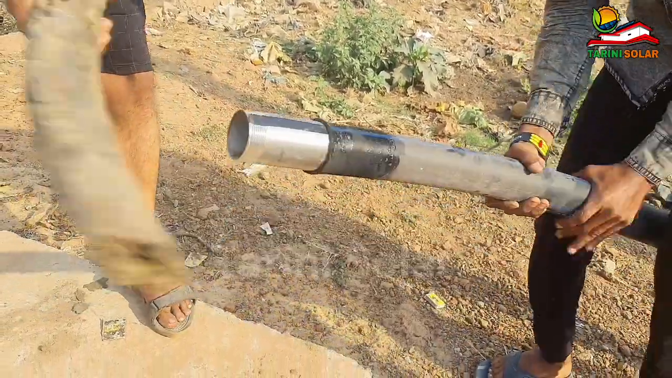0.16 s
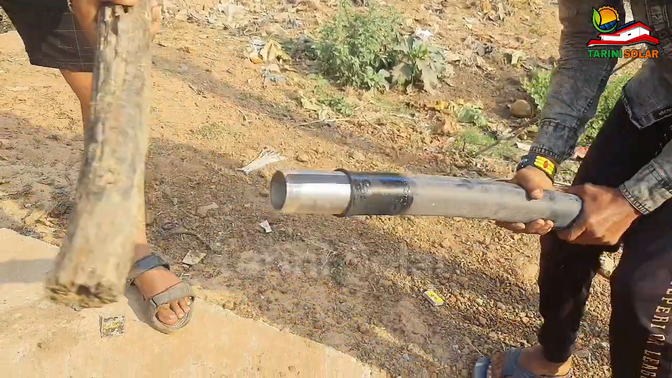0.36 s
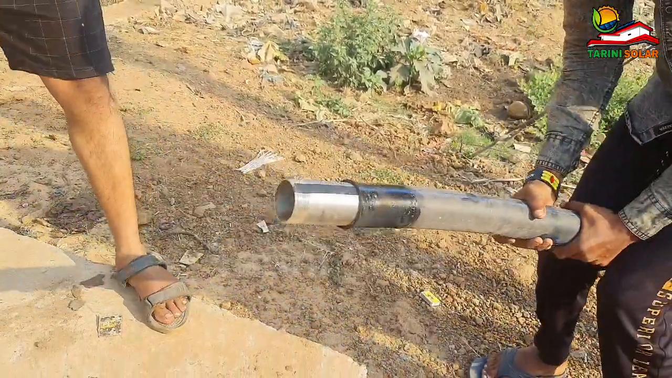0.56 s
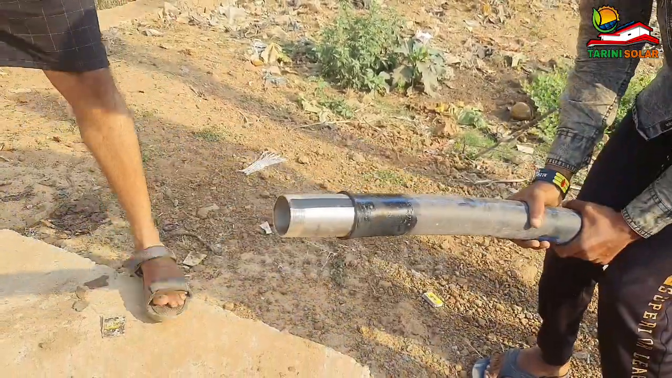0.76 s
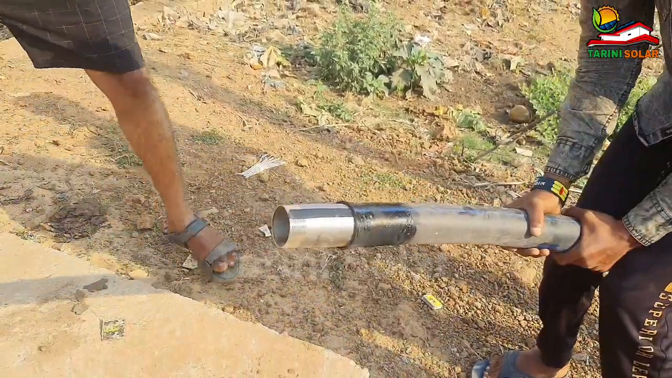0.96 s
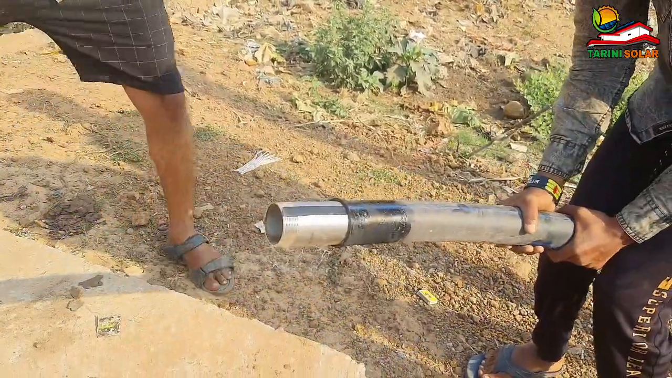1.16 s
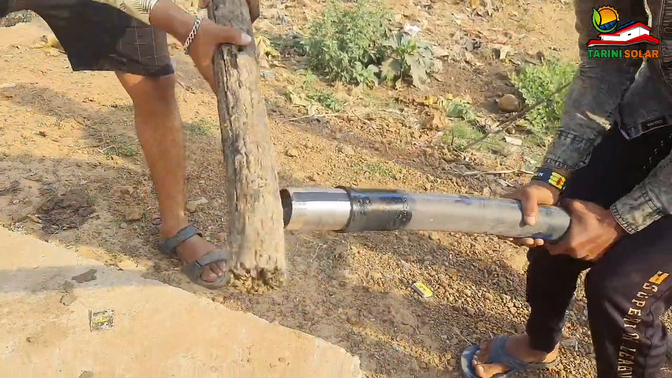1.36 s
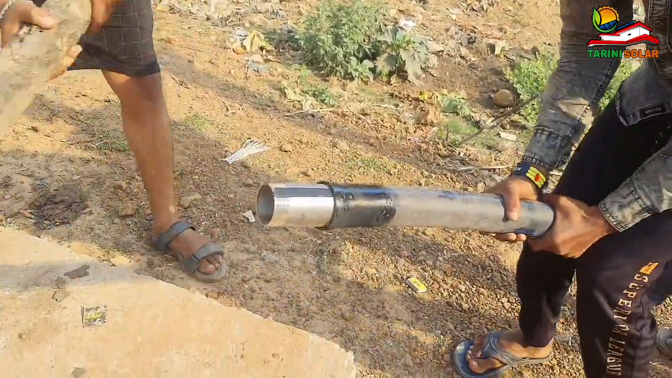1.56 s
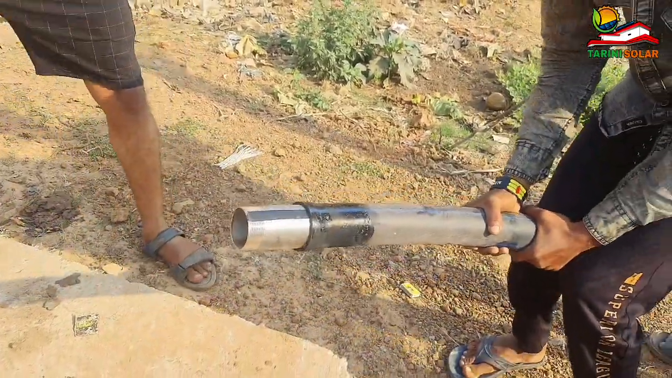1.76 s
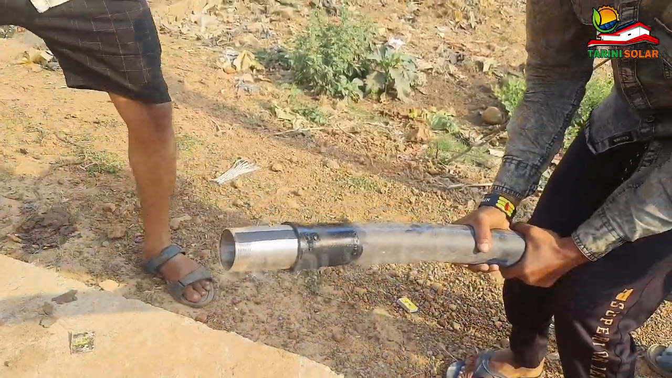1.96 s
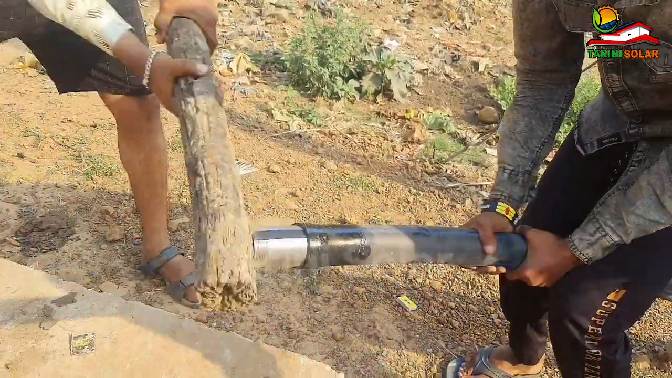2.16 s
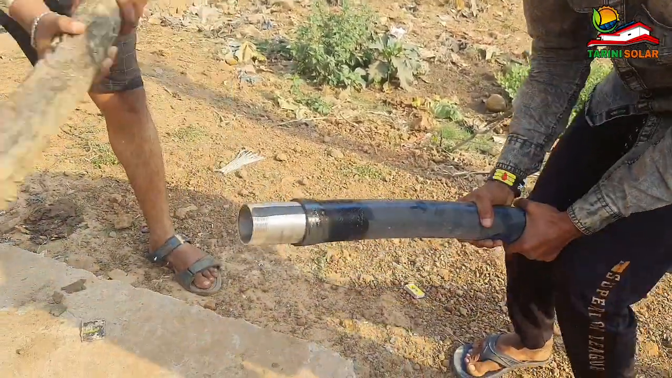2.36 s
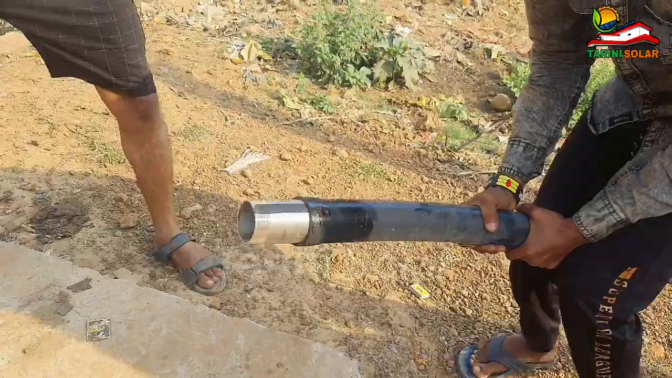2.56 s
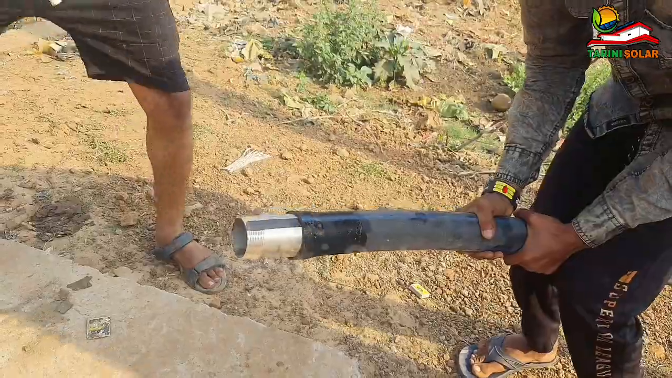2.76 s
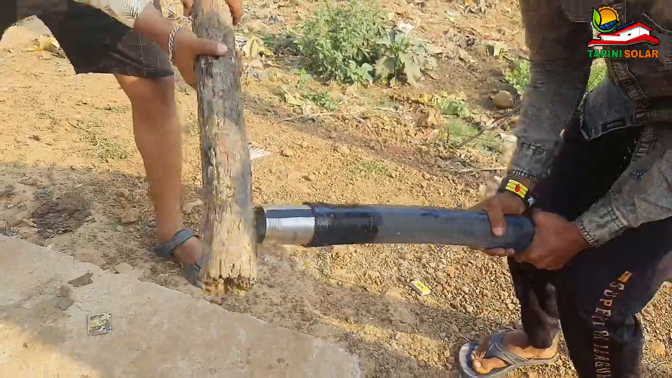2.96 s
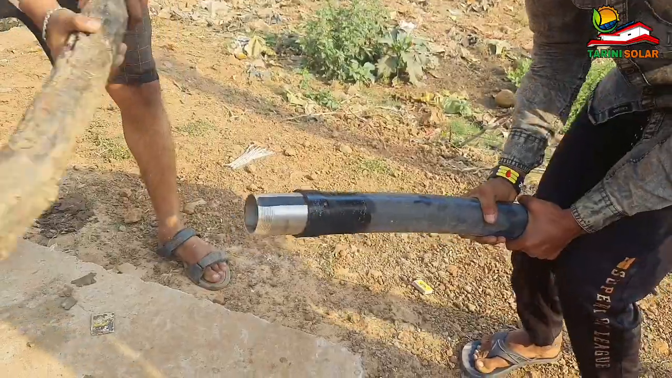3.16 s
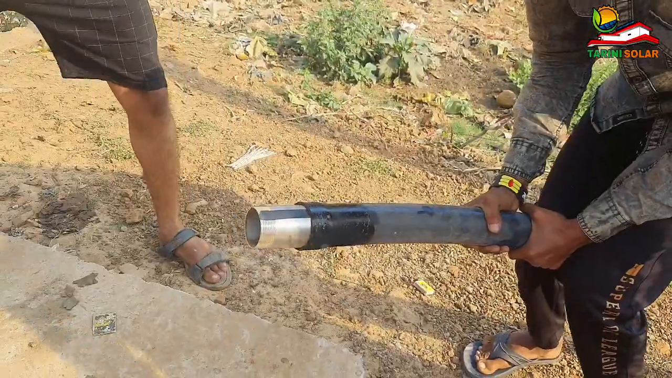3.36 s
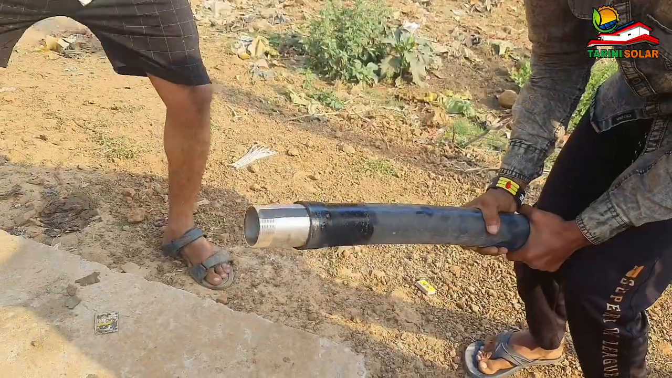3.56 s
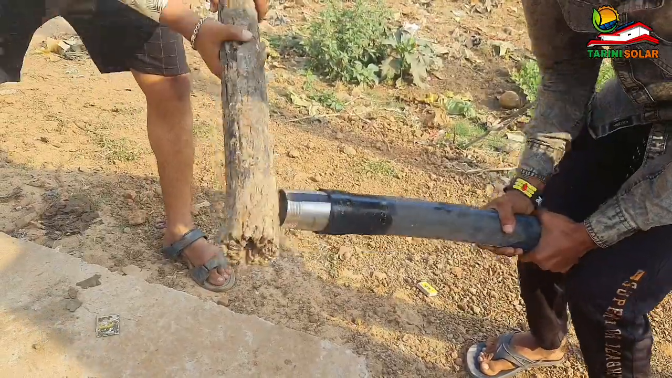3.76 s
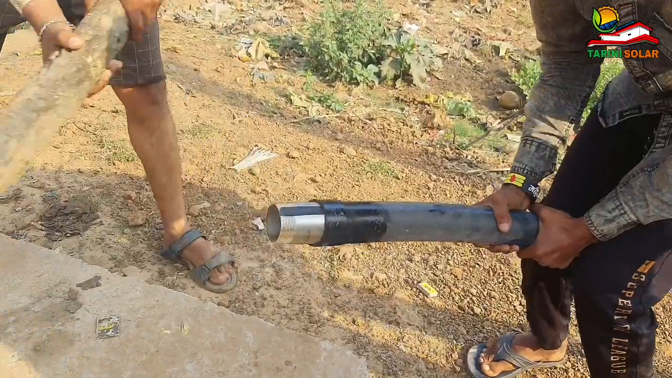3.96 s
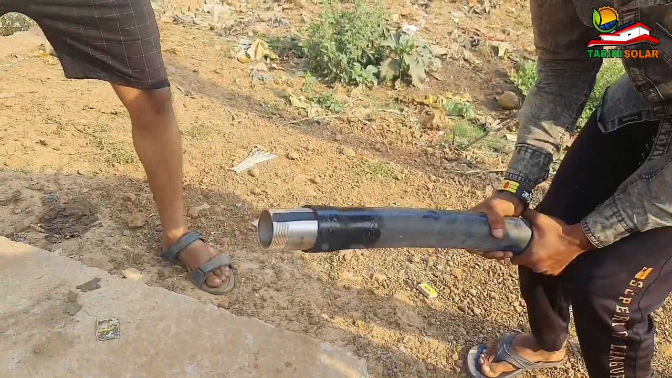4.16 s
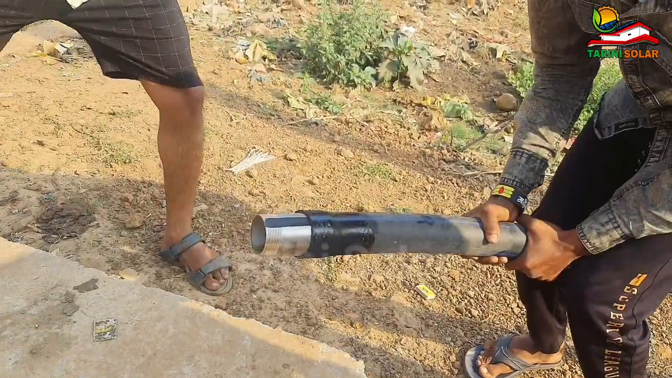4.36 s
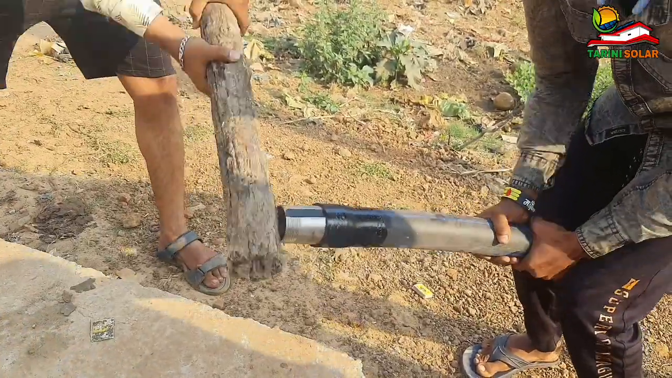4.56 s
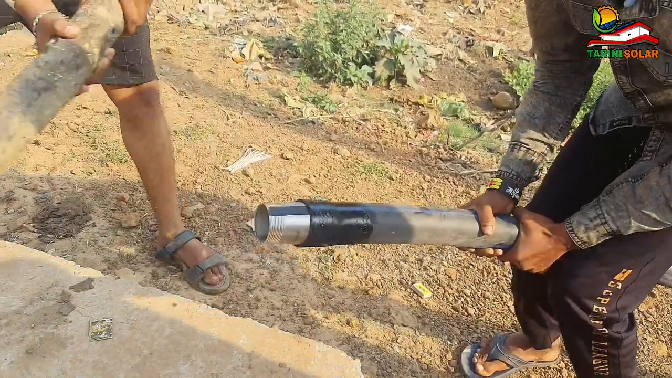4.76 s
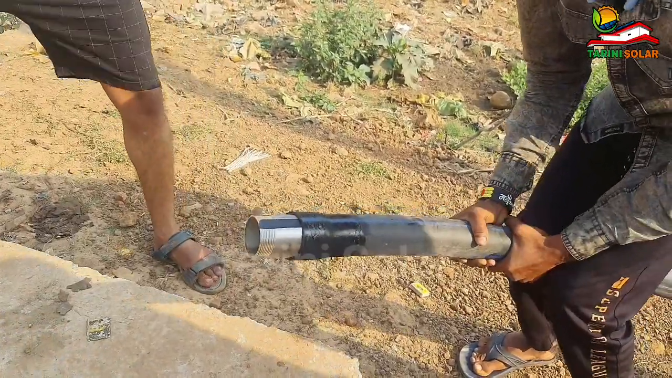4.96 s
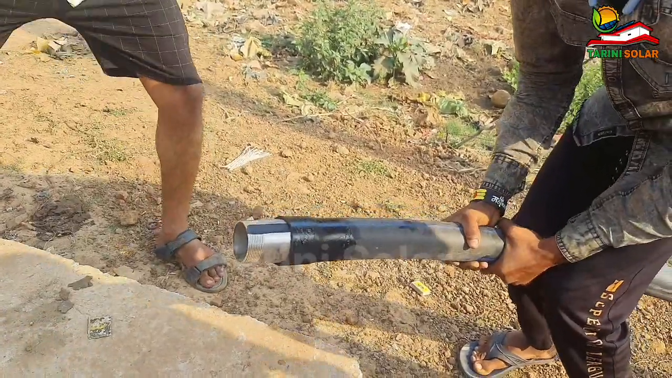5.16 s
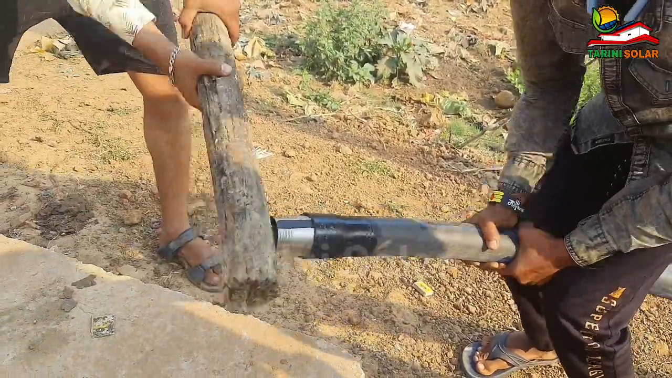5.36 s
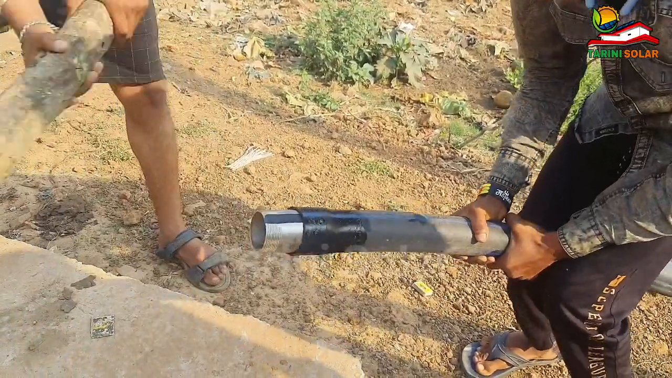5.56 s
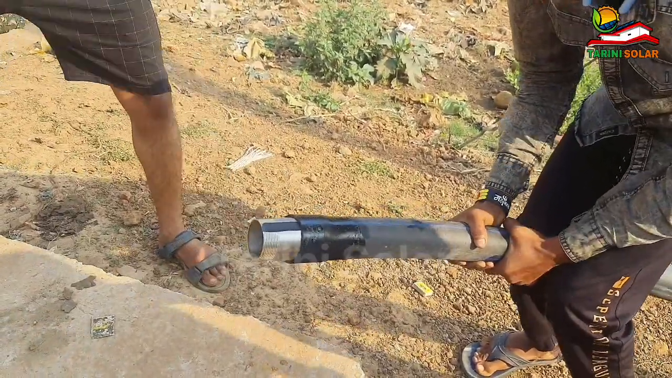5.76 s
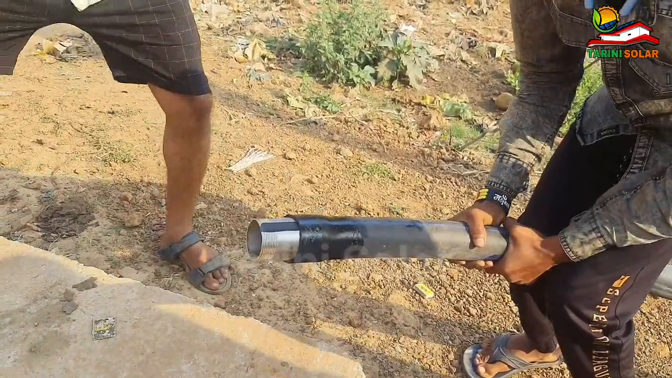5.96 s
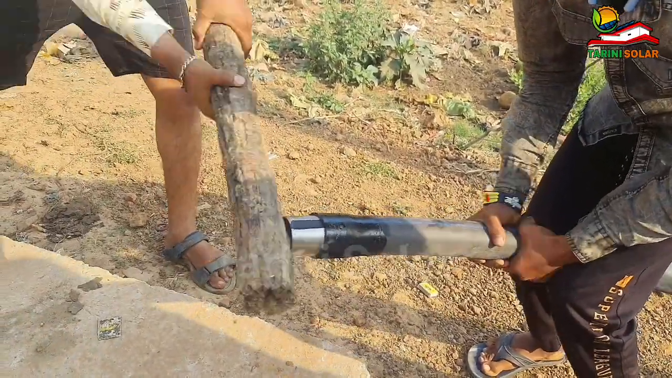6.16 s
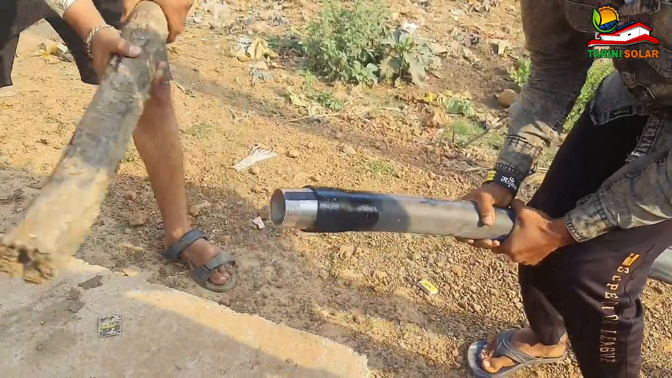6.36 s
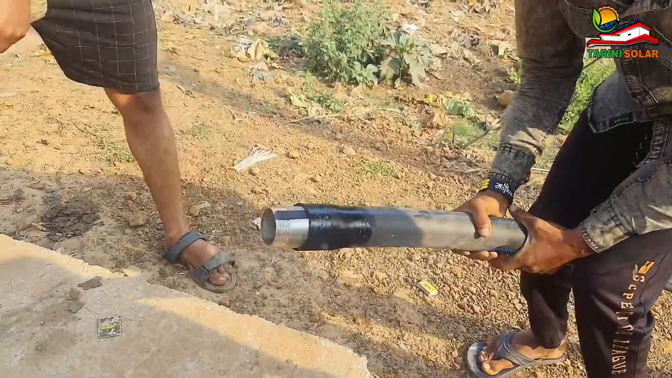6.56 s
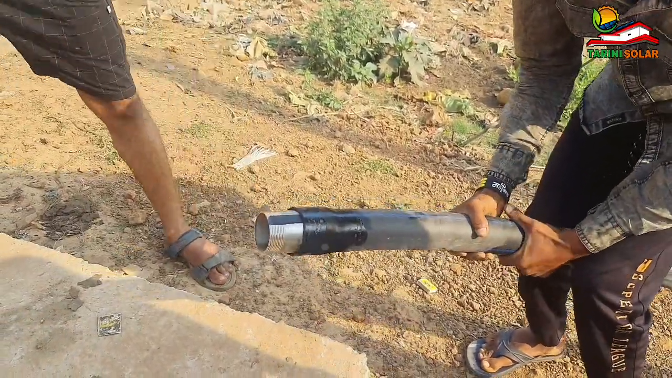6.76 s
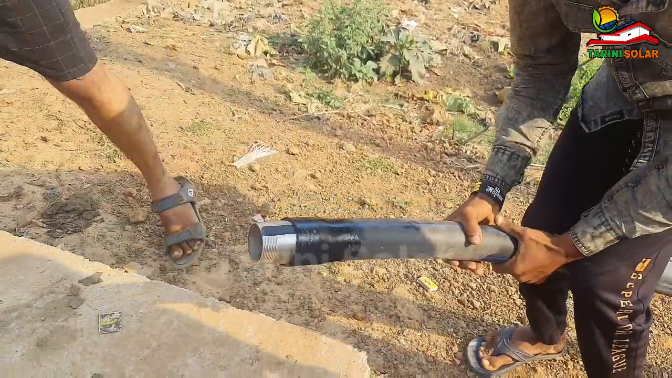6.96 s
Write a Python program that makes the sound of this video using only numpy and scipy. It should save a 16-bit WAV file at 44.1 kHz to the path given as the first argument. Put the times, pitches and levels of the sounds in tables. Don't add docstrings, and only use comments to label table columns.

```python
import sys
import numpy as np
from scipy import signal
from scipy.io import wavfile

SR = 44100
rng = np.random.default_rng(int(sys.argv[2]) if len(sys.argv) > 2 else 0)


def attenuation_scalar(level_db):
    decades = np.asarray(level_db, float) / 20
    return 10 ** decades


def inscribe(sig):
    pcm = np.round(np.clip(np.atleast_2d(sig).T, -1, 1) * 32767)
    wavfile.write(sys.argv[1], SR, pcm.astype(np.int16))


N = 308700

# start_s, peak_db, crack_brightness_db, upper_boom_db, pipe_return_db
BLOWS = [
    (0.138, -6, 0.5, -9, -31.5),
    (1.265, -4.5, -2.5, -13.5, -16.5),
    (2.111, -2, 1.5, 6.5, -49.5),
    (2.889, 0, 3, 1, -26),
    (3.677, -2, 2, 7, -25),
    (4.49, -3, 3.5, 13, -24),
    (5.29, -4.5, 5.5, 11.5, -22),
    (6.111, -3, 1, 11, -23),
]
# log_low_modes_db, log_high_modes_db, sleeve_db, lower_boom_db, near_wall_db
LANDING = [(9, -8, -15, -11, 4), (-5.5, 4.5, 4, -8, 1), (-1.5, -3.5, -6, 3, -6), (-3.5, 0, -0.5, 4.5, -12),
           (0, -13.5, 3, -7.5, -4), (-1.5, -1, -5.5, -11, -12), (2.5, 5, 4.5, -2, -7), (0, 2, 2.5, -8, -13)]


def rms_one(x):
    return x / np.sqrt(np.mean(x ** 2) + 1e-20)


def at_hz(points, hz, column=1):
    points = np.array(points)
    return np.interp(np.log(hz), np.log(points[:, 0]), points[:, column])


def power_of(db):
    return attenuation_scalar(2 * db)


def clicks(times, gains):
    out = np.full(N, 1e-18)
    np.add.at(out, np.clip((np.asarray(times) * SR).astype(int), 0, N - 1), gains)
    return out


def fade(x, t60):
    return signal.lfilter([1], [1, -attenuation_scalar(-60 / (t60 * SR))], x)


def ring(x, hz, t60):
    r, w = attenuation_scalar(-60 / (t60 * SR)), 2 * np.pi * hz / SR
    return signal.lfilter([0, np.sin(w)], [1, -2 * r * np.cos(w), r * r], x)


def resonance(x, hz, width_hz):
    r = np.exp(-np.pi * width_hz / SR)
    feedback = [1, -2 * r * np.cos(2 * np.pi * hz / SR), r * r]
    return signal.lfilter(np.array([1, 0, -1]) * (1 - r * r) / 2, feedback, x)


def later(x, seconds):
    return np.interp(np.arange(N) - seconds * SR, np.arange(N), x, left=0)


def drift(rate):
    r = np.exp(-40 * np.pi * rate / SR)
    slow = signal.lfilter([1], [1, -2 * r, r * r], rng.standard_normal(N // 20 + 2002))[2000:]
    return np.interp(np.arange(N) / 20, np.arange(len(slow)), rms_one(slow))


def crack():
    # pitch_hz, level_db, t60_s
    log_tones = [(730.7, -16.5, 0.096), (880, -20.5, .05), (1028.6, -9, 0.041), (1180, -18, 0.038),
                 (1320, -11.5, 0.036), (1483, -12.5, 0.03), (1600, -22, 0.0068), (1790, -15.5, 0.011),
                 (2390, -26, 0.0048), (2637, -18, 0.023), (3330, -19, 0.012), (4220, -17, 0.016)]
    s, peak_db = np.transpose(BLOWS)[:2]
    low_db, high_db, sleeve_db, _, _ = np.transpose(LANDING)
    out = np.zeros((2, N))
    luck = rng.standard_normal((len(s), 4, len(log_tones)))
    for k, (hz, db, t60) in enumerate(log_tones):
        landing_db = low_db if hz < 1240 else high_db if hz < 2100 else sleeve_db
        struck_db = peak_db + db + landing_db
        start = s - 0.0008 + 1.6 / hz + 0.00022 * luck[:, 0, k]
        for port in range(2):
            gain = attenuation_scalar(struck_db + 1.5 * luck[:, 1, k] + 2.0 * luck[:, 2 + port, k])
            gain = gain * (-1) ** k
            out[port] += ring(clicks(start + 0.00008 * luck[:, 3 - port, k], gain), hz, t60)
    return out


def landing_knock():
    # lower_hz, lower_db, upper_hz, upper_db, t60_s
    knock_tones = [(950, -9.5, 930, -13.5, .04), (1224, -6, 1500, -17.5, .04),
                   (988, -4.5, 1400, -12.5, 0.037), (635, -12.5, 1250, -12.5, 0.11),
                   (1060, -6, 1100, -9.5, 0.049), (770, -16.5, 1070, -9.5, .05),
                   (930, -8.5, 1800, -9.5, .045), (1048, -2, 950, -9, 0.036)]
    rise_s, port_lag_s, low_late_s = 0.00073, 0.00008, 0.0015
    out = np.zeros((2, N + 4000))
    span = np.arange(4000) / SR

    def struck(t, hz, db, t60):
        return (1 - np.exp(-t / rise_s)) * np.sin(2 * np.pi * hz * t) * attenuation_scalar(db - 60 * t / t60)

    t = np.maximum(span - np.array([[0], [port_lag_s]]), 0)
    for (s, *_), (low_hz, low_db, high_hz, high_db, t60) in zip(BLOWS, knock_tones):
        lower = struck(np.maximum(t - low_late_s, 0), low_hz, low_db, t60)
        upper = struck(t, high_hz, high_db, t60 * 0.82)
        out[:, int(s * SR):int(s * SR) + 4000] += lower + upper
    return out[:, :N]


def boom():
    # pitch_hz, level_db, t60_s, arrival_s
    pipe_tones = [(110.6, -24, 0.14, 0.0043), (172.5, -5.5, 0.18, 0.0064), (192.2, -13, 0.21, .0072),
                  (261.8, -16.5, 0.25, 0.0095), (301.7, -21, 0.37, .008), (413, -21, 0.26, .0082),
                  (580, -23.5, 0.24, .008), (621.5, -14.5, 0.2, .006)]
    # pitch_hz, level_db, t60_s, arrival_s
    grip_tones = [(212.5, -18, 0.44, 0.0089), (363, -24, 0.23, .008)]
    # near_209_hz_db, near_352_hz_db, near_415_hz_db,
    # near_630_hz_db, main_boom_db
    grip = [(-6, -6.5, -4, 1.5, 2), (-13, 2.5, -9, -4.5, -2), (-8, 8, 1, -0.5, -4.5),
            (-9, 0.5, 3, -2.5, -3), (1, -3.5, 4, -5.5, -1.5), (1.5, -13.5, 2, 3, 2.5), (-7.5, -5, 1, -3, 2),
            (-4.5, -12, 5, 2, 1.5)]
    s, peak_db, _, upper_db, back_db = np.transpose(BLOWS)
    lower_db = np.array(LANDING)[:, 3]
    out = 0
    luck = rng.standard_normal((len(s), len(pipe_tones)))
    for k, (hz, db, t60, arrival) in enumerate(pipe_tones + grip_tones):
        level_db = peak_db + 2.0 + db + 0.83 * luck[:, k % len(pipe_tones)]
        level_db = level_db + upper_db * (230 < hz < 280) + lower_db * (185 < hz < 200)
        for near_hz, hands_db in zip([209, 352, 415, 630, 172], np.transpose(grip)):
            level_db = level_db + hands_db * (abs(hz / near_hz - 1) < 0.04)
        push = fade(clicks(s + arrival, attenuation_scalar(level_db)), 0.67 / hz) * hz * 3.14 / SR
        out = out + 1.83 * ring(push, hz, t60)
    round_trip_s = 0.0745
    trips = np.arange(1, 10)
    return_s = s[:, None] + 0.001 + round_trip_s * trips
    return_db = back_db[:, None] - 3.75 * trips
    back = clicks(return_s.ravel(), attenuation_scalar(return_db).ravel())
    back = fade(back, 0.023) * 710.0 / SR
    return out + ring(back, 124, 0.043) + 0.76 * ring(back, 175, 0.037)


def walls():
    # delay_s, level_db, pitch_hz, width_hz
    far_walls = [
        (0.1316, -26, 1150, 483),
        (0.146, -28, 644, 300),
        (0.292, -45.5, 514, 300),
    ]
    # near_hz, second_hz, second_db
    echo = [(1000, 790, 1.5), (1300, 600, 2), (1100, 640, -2.5), (1300, 600, -3), (1150, 680, 0),
            (1300, 610, 0.5), (1320, 670, 0.5), (1389, 670, -4)]
    out = np.zeros(N + 2000)
    click = signal.unit_impulse(2000)
    for (s, peak_db, *_), landing, (near_hz, second_hz, second_db) in zip(BLOWS, LANDING, echo):
        own_pitches, own_levels = [near_hz, second_hz, None], [landing[-1], second_db, 0]
        for (lag, db, hz, width_hz), own_hz, own_db in zip(far_walls, own_pitches, own_levels):
            pitch_hz = own_hz or hz
            slap = resonance(resonance(click, pitch_hz, width_hz), pitch_hz, width_hz)
            at = int((s + lag) * SR)
            out[at:at + 2000] += attenuation_scalar(peak_db + db + own_db) * SR / width_hz * slap
    return out[:N]


def contacts():
    # first_touch_db, second_touch_db
    rebounds = [(-41, -65), (-31, -43), (-28.5, -30), (-36.5, -37), (-27, -33), (-21.5, -39.5),
                (-30.5, -46), (-26.5, -37)]
    # delay_s, pitch_hz, grit_db, thud_db, snap_db
    touch_kinds = [
        (.0435, 798, -13, -9.5, -14),
        (.078, 750, -26, -29, -9.5),
    ]
    # start_s, peak_db, pitch_hz, thud_db, grit_db
    ground_slaps = [(0.4, -49.5, 1100, 15.5, 0), (0.549, -51.5, 880, 12, -32), (0.686, -56, 850, 15, -19),
                    (2.376, -18.5, 1535, -6, -11.5), (2.399, -24.5, 960, -1, -18),
                    (2.445, -28.5, 1180, 6, -7.5), (2.731, -48, 990, 6.5, -23),
                    (3.117, -31.5, 1070, 8.5, -14), (3.149, -35, 1210, 13, -11), (3.24, -43, 900, -17, -4),
                    (3.405, -53, 1200, -18, -25.5), (3.927, -39.5, 1025, 5, -30), (4.207, -58, 300, 6, -40),
                    (2.38, -26.5, 580, -3, -16), (3.17, -40, 334, 6, -25), (6.374, -31.5, 1100, -2, -20),
                    (6.343, -36.5, 1300, -2, -22), (4.74, -38.5, 496, -2, -25), (3.972, -58, 600, -1, -30),
                    (4.608, -36, 975, -4, -7), (4.721, -31, 1036, 4, -28), (4.762, -42, 1940, 3, -12),
                    (5.521, -31.5, 614, 2.5, -6.5), (5.642, -45.5, 925, 9, -38),
                    (5.68, -46, 970, 11.5, -26.5), (6.354, -32, 685, 8, -3), (6.405, -50, 1188, 15, -3),
                    (6.422, -43, 1000, 14.5, -30), (6.513, -45, 696, 8, -8.5)]
    # start_s, peak_db, pitch_hz,
    # grit_db, snap_db
    more_ticks = [(0.319, -42, 950, -15, -24), (0.344, -44, 1120, -13, -16),
                  (0.485, -46.5, 1180, -6, -19.5), (0.796, -51.5, 2780, -8, -11.5),
                  (0.825, -52.5, 770, -29, -23), (0.883, -53, 865, -5.5, -9),
                  (1.013, -57.5, 706, -14, -22), (.853, -60, 740, -30, -25),
                  (1.88, -50.5, 1320, 6.5, -13.5), (1.946, -48, 1020, -31, -23),
                  (1.997, -61.5, 1210, 13, -3), (2.311, -42.5, 1110, 11, -11),
                  (2.683, -45.5, 1510, -24, -20), (2.766, -52, 845, -14, -24), (3.044, -39.5, 1073, 7, -9),
                  (3.79, -31, 1300, -25, -10), (3.76, -34, 1300, -25, -12), (3.771, -27.5, 950, -35, -19),
                  (3.925, -42, 1430, -35, -31), (0.339, -42, 2600, -20, -22), (.395, -49, 2500, -20, -24),
                  (4.019, -52, 2190, -22, -10), (.18, -18.5, 950, -24, -33), (.225, -33, 710, -30, -41),
                  (1.304, -24, 1130, -30, -17.5), (1.316, -24, 1520, -30, -23),
                  (1.398, -44, 2410, -30, -24), (1.489, -41.5, 1220, -30, -32),
                  (2.14, -24, 1900, -28, -16.5), (2.233, -34, 2450, -30, -17),
                  (2.245, -35, 2400, -30, -21), (2.326, -43, 2400, -25, -14), (3.043, -39, 2400, -32, -25),
                  (3.86, -43, 1300, -30, -24.5), (5.21, -68.5, 953, -7, -14.5),
                  (5.736, -50.5, 2180, -3, -17), (6.166, -34.5, 1150, 0, -7.5), (6.281, -44, 982, -1, -14),
                  (6.636, -52.5, 1507, -1.5, -13), (6.68, -65, 2070, -20, 0.5)]
    rows = []
    for blow, pair in zip(BLOWS, rebounds):
        for db, (lag, *rest) in zip(pair, touch_kinds):
            rows.append((blow[0] + lag, db, *rest))
    for s, db, hz, thud_db, grit_db in ground_slaps:
        rows.append((s, db, hz, grit_db, thud_db, -22))
    for s, db, hz, grit_db, snap_db in more_ticks:
        rows.append((s, db, hz, grit_db, -9.5, snap_db))
    return rows


def small_knocks():
    out = np.zeros(N + 4000)
    span = np.arange(4000) / SR
    for s, peak_db, hz, _, thud_db, _ in contacts():
        overtone = 0.3 * np.sin(2 * np.pi * 2.9 * hz * span) * attenuation_scalar(-60 * span / 0.015)
        tick = (np.sin(2 * np.pi * hz * span) + overtone) * attenuation_scalar(peak_db - 60 * span * hz / 33.0)
        swell = (1 - np.exp(-span / 0.02)) * attenuation_scalar(peak_db + thud_db + 5.5 - 60 * span / 0.075)
        thud = np.sin(2 * np.pi * 172 * span) + 0.71 * np.sin(2 * np.pi * 255 * span)
        thud = swell * (thud + 0.5 * np.sin(2 * np.pi * 105 * span))
        out[int(s * SR):int(s * SR) + 4000] += tick + thud
    return out[:N]


def clacks():
    # start_s, peak_db, pitch_hz
    clack_events = [(2.189, -29, 1800), (2.188, -34, 3600), (2.375, -25, 1570), (2.374, -32, 3950),
                    (2.398, -27, 986), (2.683, -53, 1500), (3.121, -38, 1000), (3.142, -39, 1300),
                    (3.252, -45, 1600), (3.757, -16, 1790), (3.789, -29, 1750), (4.204, -51.5, 776),
                    (4.204, -47, 420), (4.573, -38, 2300), (4.607, -39, 970), (4.72, -35, 1340),
                    (4.762, -42, 1900), (5.521, -30.5, 1050), (5.521, -32, 1820), (6.356, -30.5, 1300),
                    (6.425, -42, 1000), (6.153, -34, 1850), (1.946, -46, 1020), (3.035, -36, 1250)]
    rise_s, fall_s = 0.001, 0.0035
    out = np.zeros(N + 1500)
    t = np.arange(1500) / SR
    shape = 2 * (1 - np.exp(-t / rise_s)) * np.exp(-t / fall_s)
    for s, peak_db, hz in clack_events:
        out[int(s * SR):int(s * SR) + 1500] += attenuation_scalar(peak_db) * shape * np.sin(2 * np.pi * hz * t)
    return out[:N]


def stirring():
    # slide_length_s, # rumble_db, scrape_db, grit_db, later_swell_db
    slides = [(0.15, -60, -56.5, -69, -54), (0.14, -56, -51, -70.5, -50), (0.125, -49, -55.5, -49, -48.5),
              (0.059, -46, -54.5, -46, -46), (0.081, -47.5, -64, -72, -48), (.22, -47.5, -58.5, -56, -55),
              (0.18, -44, -58, -63, -49), (0.19, -46.5, -61.5, -66, -52)]
    # start_s, length_s, rumble_db, scrape_db, grit_db
    other_drags = [(.30, 0.025, -55, -54.5, -46), (.43, 0.17, -50, -68.5, -67.5),
                   (1.5, 0.16, -49.5, -61.5, -71), (1.915, 0.041, -68, -57, -79),
                   (.79, 0.072, -66, -77, -78), (3.23, 0.027, -54.5, -57.5, -59),
                   (3.9, 0.18, -60, -67, -89.5), (4.84, 0.04, -62.5, -62, -67.5),
                   (6.55, 0.31, -67.5, -87, -73), (2.3, 0.048, -48.5, -53, -44),
                   (2.39, 0.062, -40.5, -50.5, -46), (2.67, 0.084, -56.5, -72, -75),
                   (3.035, 0.015, -60, -68, -46), (3.11, 0.052, -43.5, -56, -50.5),
                   (3.41, 0.049, -51.5, -68.5, -82), (4.65, 0.02, -48.5, -53.5, -47),
                   (4.72, 0.14, -46, -77, -82), (5.51, 0.04, -42.5, -57, -62), (5.62, 0.1, -69, -70, -83),
                   (6.32, 0.097, -44.5, -57, -58)]
    step_db = [2.5, -1, -2.5, 1, -5.5, -2, -0.5, -4.5]
    # time_s, level_db
    fidget = [(0, -69.5), (.6, -70.5), (1.15, -71), (1.8, -69), (2.7, -71), (3.5, -72), (4.3, -78),
              (5.1, -76.5), (5.9, -90), (6.6, -68.5), (7, -82)]
    # rumble_db, scrape_db, rustle_db, grit_db
    fidget_mix_db = [8, -1, -3, -1]
    settle_db_per_s = [75.4, 130, 130, 423]
    swing_db = [-58, -65.5, -67, -62.5]
    swing_rise_db_per_s, attack_s = 61, 0.0089
    drags = list(other_drags)
    for (s, *_), (length, rumble_db, scrape_db, grit_db, later_swell_db) in zip(BLOWS, slides):
        drags.append((s + 0.016, length, rumble_db, scrape_db, grit_db))
        drags.append((s + 0.12, 0.025, later_swell_db + 6.5, later_swell_db, later_swell_db - 6.5))
    start, length, rumble_db, scrape_db, grit_db = np.transpose(drags)[..., None]
    t = np.arange(0, N, 64) / SR
    attack = np.clip((t - start) / attack_s, 0, 1) ** 2
    since_end = np.maximum(t - start - length, 0)
    to_blow = np.array(BLOWS)[:, :1] - t
    steps = power_of(np.c_[step_db] - swing_rise_db_per_s * np.abs(to_blow))
    swing = np.sum(steps * (to_blow > 0), axis=0)
    fidget_db = np.interp(t, *np.transpose(fidget))
    drag_db = [rumble_db, scrape_db, scrape_db - 11, grit_db]
    layers = []
    for db, settle, step_mix_db, feet_mix_db in zip(drag_db, settle_db_per_s, swing_db, fidget_mix_db):
        power = np.sum(attack * power_of(db - settle * since_end), axis=0)
        power = power + power_of(step_mix_db) * swing + power_of(fidget_db + feet_mix_db)
        layers.append(np.interp(np.arange(N) / SR, t, power))
    return layers


def grains(per_second, spread_db, t60):
    fall = rng.random(N) < per_second / SR
    return fade(fall * attenuation_scalar(spread_db * np.minimum(rng.exponential(1, N), 3)), t60)


def noise_of_pipe_and_gravel():
    # pitch_hz, crack_db, shudder_db, shudder_t60_s, far_tail_db
    burst = [(40, -73.5, -50.5, .25, -58.5), (66, -60, -45, 0.44, -48), (120, -53, -28.5, 0.3, -51),
             (300, -36, -26, 0.27, -39.5), (670, -17.5, -28, 0.16, -46.5), (1330, -17, -39.5, 0.35, -57),
             (2340, -29, -46.5, 0.12, -52), (4800, -31, -54.5, 0.25, -69.5), (8600, -40.5, -72.5, .2, -70),
             (16100, -35.5, -70, .2, -78)]
    # pitch_hz, level_db (per Hz)
    rumble_colour = [(40, -23), (60, -6.5), (90, 0), (140, -4.5), (200, -11), (300, -9.5), (420, -31)]
    # pitch_hz, level_db (per Hz)
    scrape_colour = [(200, -19.5), (400, -6.5), (700, 2.5), (1300, -0.5), (2200, -4.5)]
    # pitch_hz, level_db (per Hz)
    rustle_colour = [(1500, -11), (2300, 5), (3500, 0.5), (5000, 2), (7500, -14)]
    # pitch_hz, level_db (per Hz)
    grit_colour = [(3000, -12.5), (6000, 2), (8500, 4.5), (11000, -2), (14500, -1.5), (16000, -9)]
    # pitch_hz, level_db (per Hz)
    slap_colour = [(200, 7), (400, 10.5), (800, -5), (1500, 3.5), (2500, -2.5), (4000, -9), (6500, -16),
                   (16000, -38)]
    # pitch_hz, level_db
    air = [(36, -65), (60, -55.5), (120, -65.5), (400, -77.5), (1500, -70), (4000, -73), (7000, -75),
           (16000, -77.5)]
    # pitch_hz, likeness (0 to 1)
    likeness = [(50, 0.5), (120, .9), (300, 0.99), (700, 0.6), (1500, 0.43), (4000, 0.086), (12000, 0.83)]
    bark_db = [-31, -30.5, -39.5, -28, -49.5, -47.5, -19, -40.5]
    bands = 36 * 2 ** (np.arange(23) / 2.5)
    crack_t60_s, tail_t60_s = 0.022, 0.47

    s, peak_db, bright_db, _, _ = np.transpose(BLOWS)
    at, slap_db, _, slap_grit_db, _, snap_db = np.transpose(contacts())
    rumble, scrape, rustle, grit = stirring()
    hit = clicks(s + 0.0003, power_of(peak_db))
    bright = clicks(s, power_of(peak_db + bright_db))
    splinter = clicks(s - 0.003, power_of(peak_db + bright_db + bark_db))
    splinter = fade(fade(splinter, 0.0065), 0.0065)
    snap_low = fade(hit, crack_t60_s)
    snap_high = fade(bright, crack_t60_s * 0.38) + splinter
    far = fade(hit, tail_t60_s)
    shake = clicks(s + 0.0039, power_of(peak_db + 5))
    slap_low = fade(clicks(at, power_of(slap_db)), 0.048)
    slap_mid = fade(clicks(at, power_of(slap_db + snap_db + 5.0)), 0.017)
    slap_high = fade(clicks(at, power_of(slap_db + slap_grit_db + 3)), 0.016)
    stones = 1 + 0.3 * grains(90, 8.0, 0.012)
    crunch = 0.35 + grains(260, 7.0, 0.005)
    crunch /= crunch.mean()

    white = rng.standard_normal((2, 2, N))
    together = drift(27)
    out = 0
    for k, (low, high) in enumerate(zip(bands, bands[1:])):
        hz = np.sqrt(low * high)
        top = np.clip(np.log2(hz / 2500) / 1.8, 0, 1)
        band = signal.butter(2, [low, high], "band", fs=SR, output="sos")
        mid, side = signal.sosfilt(band, white[k % 2])
        shudder_t60 = at_hz(burst, hz, column=3)
        power = power_of(at_hz(burst, hz, column=2) + 24) * fade(shake, shudder_t60 / 2)
        power += power_of(at_hz(burst, hz, column=4) + 24) * far
        power += power_of(at_hz(rumble_colour, hz) + 21) * rumble * (hz < 500)
        power += power_of(at_hz(scrape_colour, hz) + 15) * scrape * (150 < hz < 2500)
        power += power_of(at_hz(rustle_colour, hz) + 9) * rustle * (1400 < hz < 8000)
        power += power_of(at_hz(grit_colour, hz) - 5) * grit * crunch * (hz > 5000)
        power *= stones if hz > 500 else 1
        power += power_of(at_hz(burst, hz) + 18) * ((1 - top) * snap_low + top * snap_high)
        slap = slap_low if hz < 2000 else slap_mid * attenuation_scalar(31.0)
        power += power_of(at_hz(slap_colour, hz) + 2) * slap
        power += power_of(at_hz(grit_colour, hz) - 8) * slap_high * top
        power = fade(power, 1.202 / hz) * hz * 5.33 / SR
        power = power + power_of(at_hz(air, hz))
        gain = np.sqrt(power / 2) * attenuation_scalar(0.92 * together + 1.6 * drift(30))
        alike = np.clip(at_hz(likeness, hz), 0, 1)
        out = out + gain * (np.sqrt(1 + alike) * mid + np.sqrt(1 - alike) * side * [[1], [-1]])
    return out


def far_tones():
    # pitch_hz, level_db
    hum = [(82, -69.5), (199.2, -67), (410, -98.5)]
    # start_s, end_s, pitch_hz, width_hz, level_db
    whistles = [(.2, .33, 4150, 40, -64), (.6, .7, 2300, 90, -66), (.62, .74, 2800, 500, -69),
                (.72, .88, 2950, 500, -70), (.65, .7, 2630, 120, -70), (.76, .87, 2620, 120, -69),
                (3.57, 3.66, 430, 80, -61), (4.05, 4.09, 630, 90, -63), (4.24, 4.325, 1190, 60, -64),
                (4.33, 4.37, 1190, 60, -66), (4.83, 4.92, 1200, 60, -64), (5.08, 5.26, 590, 50, -72)]
    hum_fade_db_per_s = 0.73
    t = np.arange(N) / SR
    slow, quick, flutter = drift(2.7), drift(24.62), drift(40)

    def tone(hz, wobble_hz):
        return np.sqrt(2) * np.sin(2 * np.pi * np.cumsum(hz + wobble_hz) / SR)

    out = np.zeros(N)
    for hz, db in hum:
        out += attenuation_scalar(db - hum_fade_db_per_s * t + 2.0 * slow) * tone(hz, 2.3 * drift(4))
    for start, end, hz, width_hz, db in whistles:
        now = slice(int(start * SR), int(end * SR))
        swell = np.nan_to_num(np.sin(np.pi * (t[now] - start) / (end - start)) ** 0.5)
        out[now] += attenuation_scalar(db + 2.5 * flutter[now]) * swell * tone(hz, 0.35 * width_hz * quick[now])
    return out


def scene():
    struck = crack() + landing_knock() + walls() + boom() + small_knocks() + clacks()
    struck = signal.sosfilt(signal.butter(4, 78, "high", fs=SR, output="sos"), struck)
    left, right = struck + noise_of_pipe_and_gravel() + far_tones()
    return np.array([left, later(right, 0.00007)])


def roll_off(x):
    return signal.sosfilt(signal.butter(12, 17030, fs=SR, output="sos"), x)


def record(dry):
    left, right = dry
    left = left - 0.66 * resonance(left, 7200, 3100)
    left = left + attenuation_scalar(8.5) * resonance(resonance(left, 13560, 6200), 12300, 5600)
    muffled = signal.sosfilt(signal.butter(7, 4100, fs=SR, output="sos"), right)
    right = muffled + attenuation_scalar(-61) * resonance(right, 11500, 5000)
    x = np.array([left, right]) * 1.032
    x = x / (1 + (x / 0.92) ** 4) ** (1 / 4)
    x = signal.sosfilt(signal.cheby2(10, 28, 16000, fs=SR, output="sos"), x)
    x = signal.sosfilt(signal.cheby2(14, 70, 17000, fs=SR, output="sos"), x)
    return roll_off(x)


dry = scene()
out = record(dry)
inscribe(out)
```